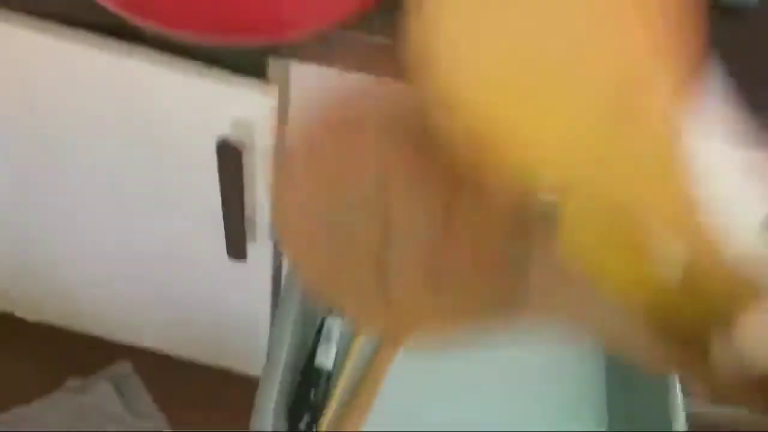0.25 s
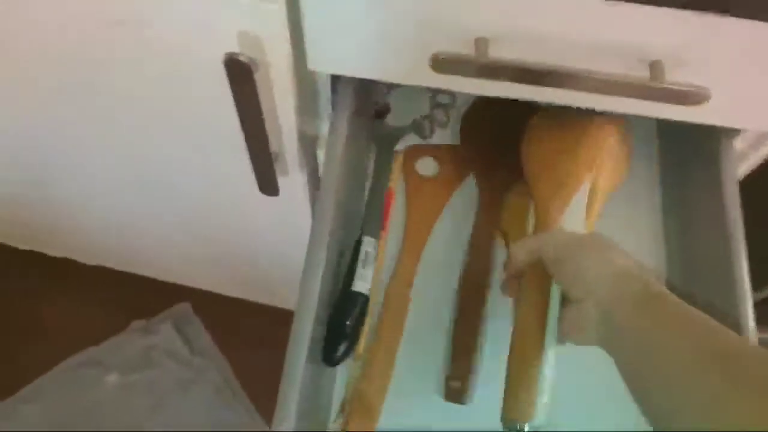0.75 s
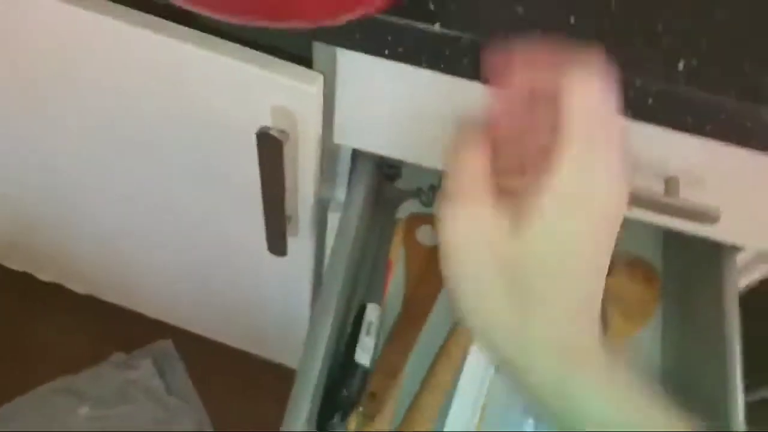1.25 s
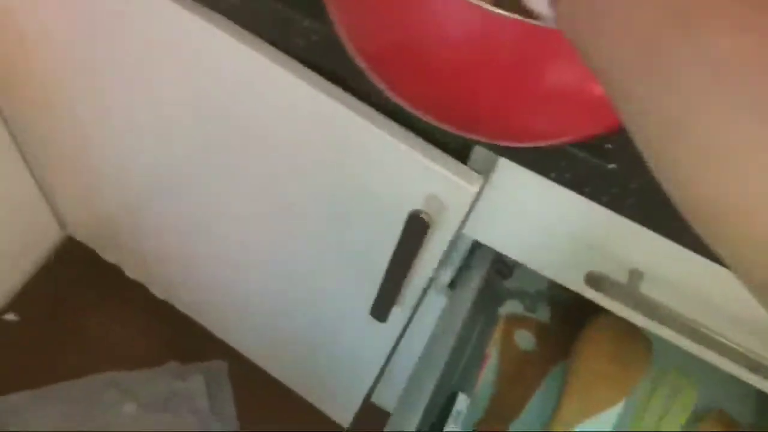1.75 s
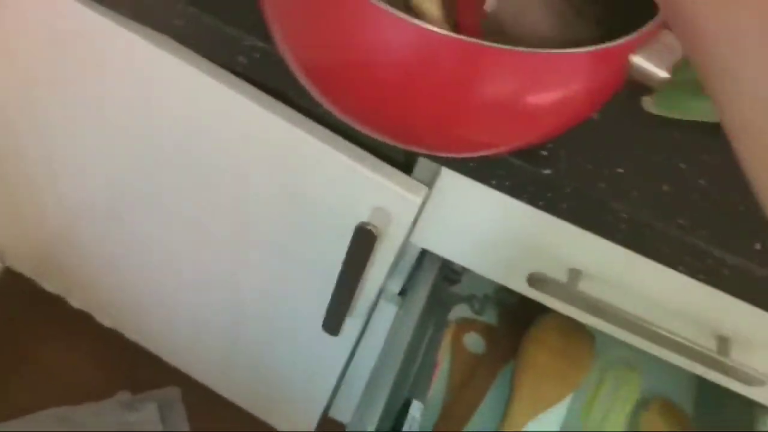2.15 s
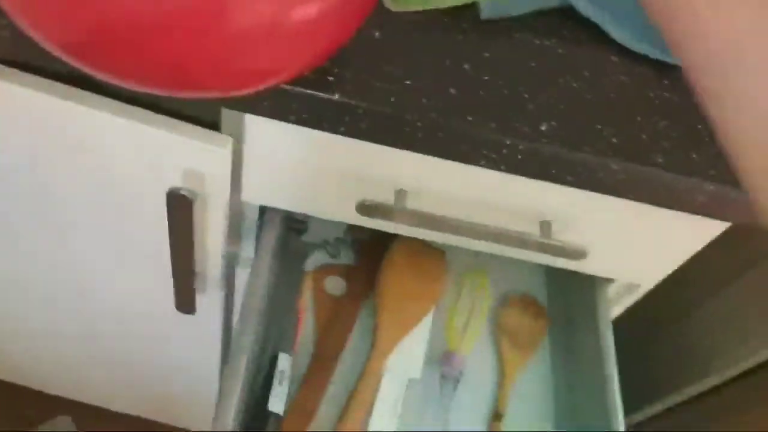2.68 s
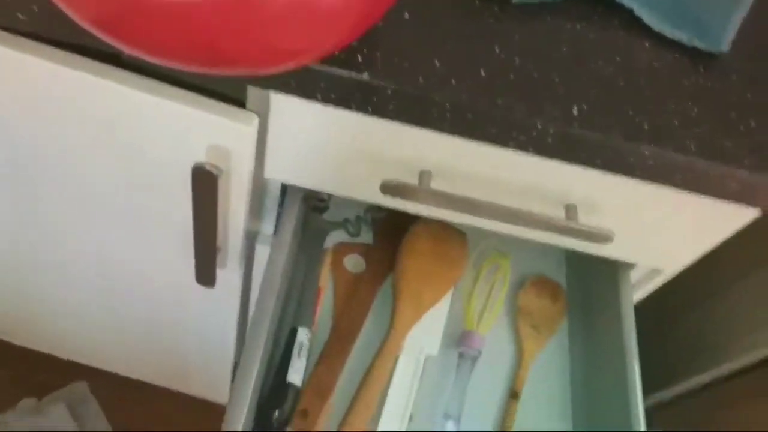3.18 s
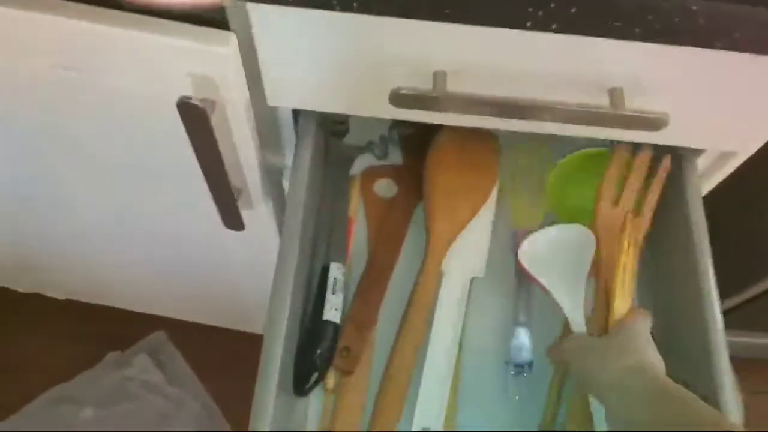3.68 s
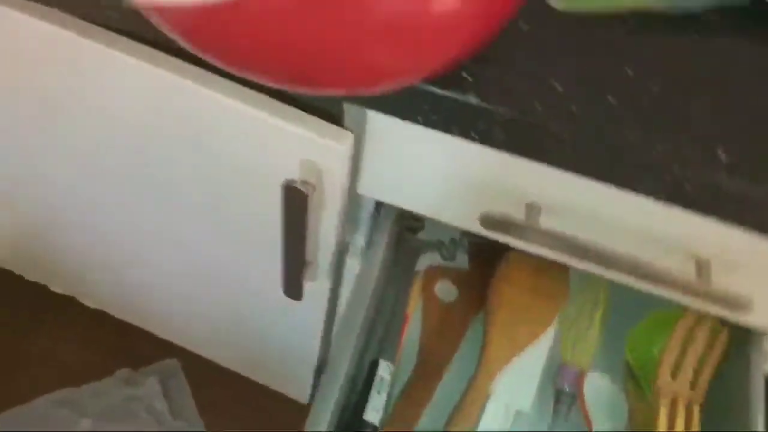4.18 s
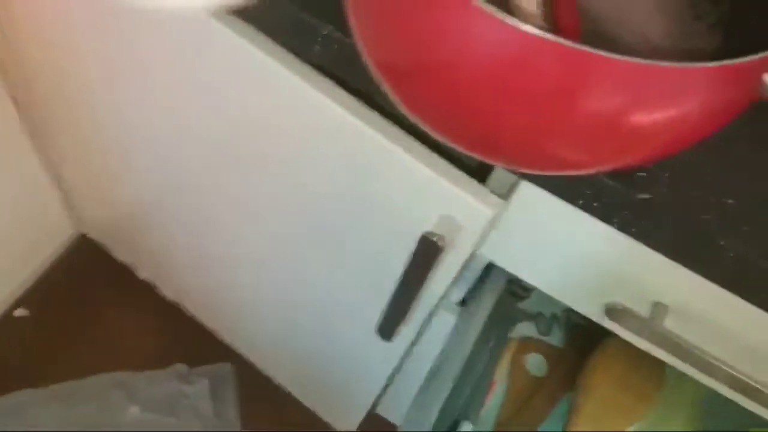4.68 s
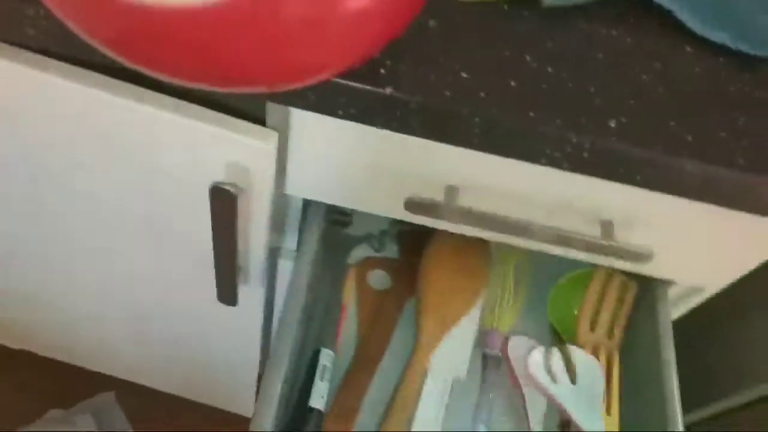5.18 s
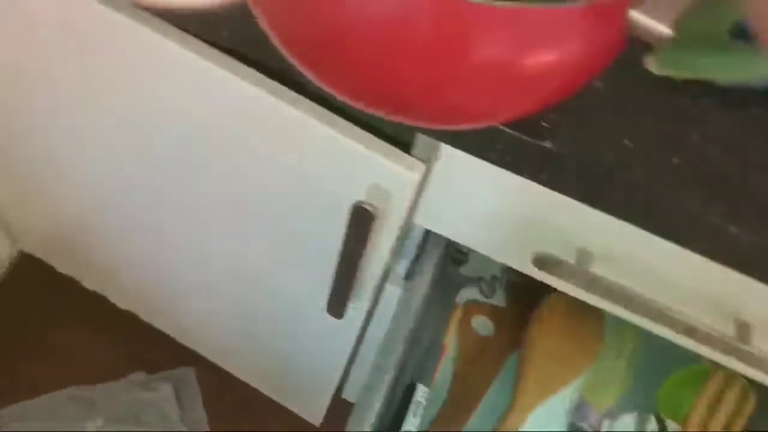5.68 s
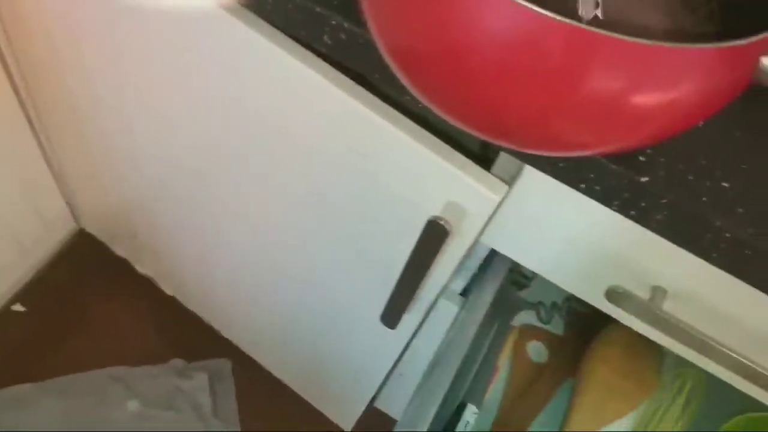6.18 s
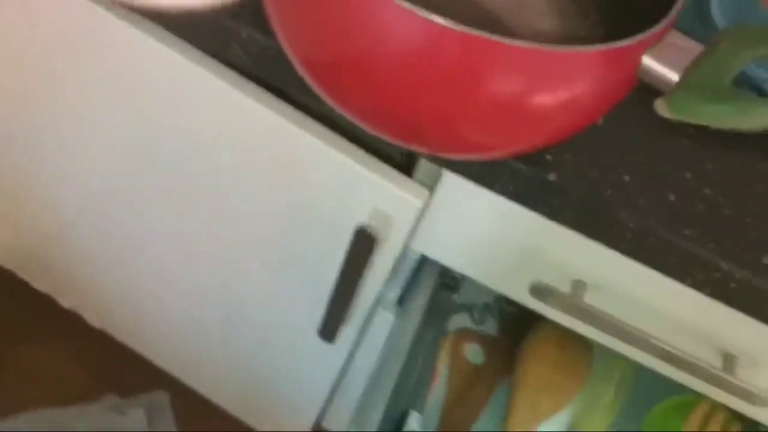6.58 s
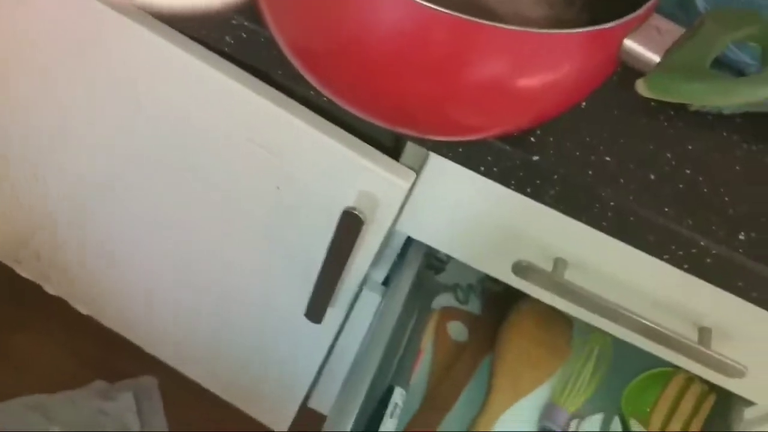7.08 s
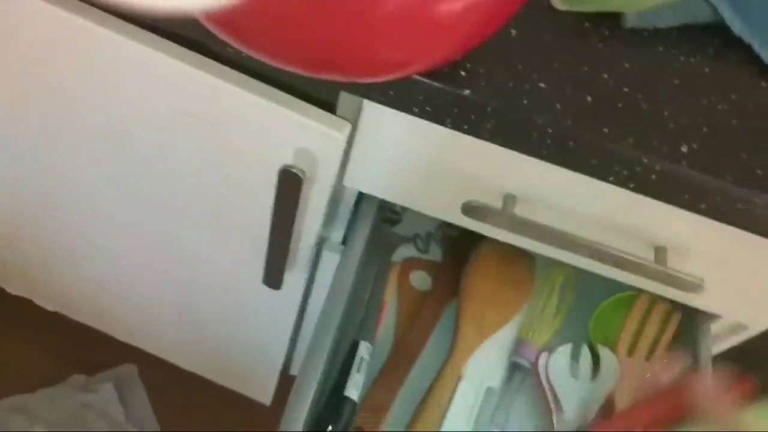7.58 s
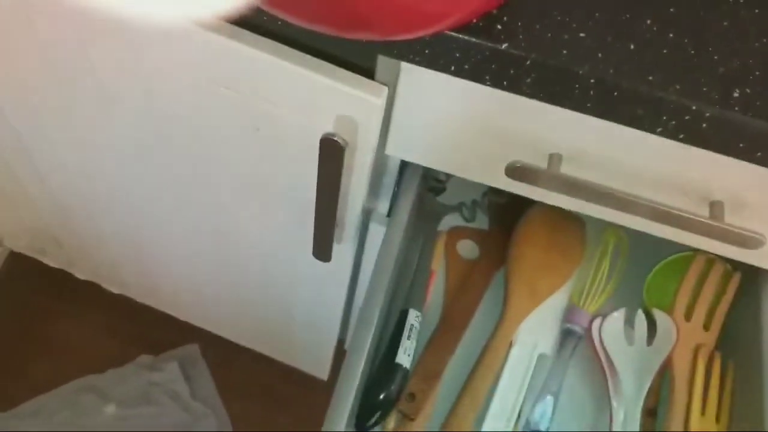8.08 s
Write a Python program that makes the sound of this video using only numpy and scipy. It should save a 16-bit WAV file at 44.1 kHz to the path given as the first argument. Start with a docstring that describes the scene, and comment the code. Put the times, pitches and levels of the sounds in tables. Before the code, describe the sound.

Handfuls of wooden, plastic and steel utensils clatter into an open kitchen drawer, with metallic pan rummaging and small ringing clinks between drops.

```python
"""A hum, a low rumble and a sweep of rustle open the scene, with a short scrape and a faint tick. Then handfuls
of utensils go from a pan on the counter into an open kitchen drawer: wooden spoons, a whisk, plastic servers, a
hard salad fork, then small steel cutlery; between drops the hand rummages in the pan. Each contact cracks,
rings its utensil, knocks the drawer's bottom and rebounds; the harder it is, the more treble and the less
knock. A small hard kitchen answers, and a limiter holds the peaks."""
import sys
import numpy as np
from scipy import signal
from scipy.fft import rfft, irfft, next_fast_len
from scipy.io import wavfile
from scipy.ndimage import uniform_filter1d, minimum_filter1d, map_coordinates

SR = 44100
rng = np.random.default_rng(int(sys.argv[2]) if len(sys.argv) > 2 else 0)


def file_out(sig):
    """Save sig as 16-bit WAV at sys.argv[1]."""
    # one column per channel
    cols = np.atleast_2d(sig).T
    # limit, then scale
    lim = np.clip(cols, -1, 1)
    pcm = np.round(lim * 32767).astype(np.int16)
    wavfile.write(sys.argv[1], SR, pcm)


N = 367794
HIT = np.arange(3 * 2 ** 13) / SR  # time since a contact [s]
CLACK_BINS = np.fft.rfftfreq(2 ** 13, 1 / SR)  # frequencies of a short clack [Hz]


def amp(db):
    """Decibels to gain."""
    return 10 ** (np.asarray(db) / 20)


def unit(x):
    """Scaled to rms 1."""
    return x / np.sqrt(np.mean(x ** 2) + 1e-20)


def along(points, hz):
    """Curve through (frequency, value) points on a log frequency axis."""
    f, v = np.transpose(points)
    return np.interp(np.log(hz + 1), np.log(f + 1), v)


def fade(t, t60):
    """Exponential decay, 60 dB in t60 seconds."""
    return np.exp(-np.log(1000) * t / np.maximum(t60, 1e-3))


def add(track, s, sound):
    """Mix a sound into a track at time s."""
    room = track[max(round(s * SR), 0):][:len(sound)]
    room += sound[:len(room)]


def noise(colour, size):
    """Noise of rms 1, shaped by a colour curve."""
    m = next_fast_len(size)
    white = rfft(rng.standard_normal(m))
    return unit(irfft(white * amp(along(colour, np.fft.rfftfreq(m, 1 / SR))), m)[:size])


# How long the small hard kitchen rings: (frequency [Hz], t60 [s])
KITCHEN_DECAY = [(150, 0.059), (600, 0.5), (2000, 0.53), (5000, .55), (9000, 0.27), (15000, 0.23)]
# Strength of the wall reflections: (frequency [Hz], level [dB])
WALL_REFLECTIONS = [(100, 5), (500, -1), (2000, -2.5), (5000, -6.5), (9000, 0), (15000, -2)]


def kitchen(x, wet_db, beamed=1):
    """Adds a freshly drawn noise tail that dies away band by band; beamed resonances stand out less in it,
    since the tail gathers sound sent in all directions."""
    hop = 2 ** 7
    hz = np.fft.rfftfreq(2 * hop, 1 / SR)
    spread = np.interp(hz, CLACK_BINS, np.ones(len(CLACK_BINS)) / np.sqrt(beamed))
    decay = fade(HIT[::hop, None], along(KITCHEN_DECAY, hz))
    gain = decay * spread * amp(along(WALL_REFLECTIONS, hz))
    white = rfft(rng.standard_normal((len(gain), 2 * hop), dtype=np.float32))
    frames = irfft(white * np.float32(gain))
    frames = frames * np.sin(np.pi * np.arange(2 * hop) / (2 * hop))
    tail = (frames[1:, :hop] + frames[:-1, hop:]).ravel()
    tail = tail * (1 - fade(HIT[:-hop], 0.0039))  # the tail builds up just behind the direct sound
    response = amp(wet_db) * tail / np.sqrt(np.sum(tail ** 2))
    response[0] = 1  # direct sound
    return signal.fftconvolve(np.float32(x), np.float32(response))


# Sweeps of the arm and what it carries: (middle [s], half length [s], rustle level [dB], hiss level [dB])
ARM_SWEEPS = [(0.155, 0.48, -53.5, -59.5), (0.682, 0.33, -58, -60.5), (1.599, 0.78, -60, -65.5),
              (2.58, 0.16, -57.5, -66), (3.542, 0.18, -63, -60), (4.3, 0.19, -61, -70),
              (8.31, 0.79, -62, -65.5)]
# Level of the rumble over time: (time [s], level [dB])
RUMBLE_LEVEL = [(0, -74), (2.1, -80.5), (2.7, -63), (4.9, -86.5), (6.6, -90), (7.3, -65.5), (8.3, -65.5)]
# Colours of still kitchen air, rumble, rustle and hiss: (frequency [Hz], density [dB per Hz])
STILL_AIR = [(25, -27), (65, -17), (105, -1.5), (300, -15), (460, -11.5), (700, -21), (1500, -20),
             (3000, -28), (7200, -29.5), (9000, -22), (11000, -34)]
RUMBLE_COLOUR = [(25, -24.5), (60, -15.5), (98, 0), (140, -1), (300, -17), (1000, -73)]
RUSTLE_COLOUR = [(30, -39.5), (90, -15.5), (170, -4.5), (420, -6.5), (700, -10.5), (1500, -23.5),
                 (3000, -63.5)]
HISS_COLOUR = [(500, -31.5), (1000, -9), (2400, -6.5), (3000, -12.5), (4800, -3.5), (6200, -12.5),
               (9200, -12.5), (15000, -32)]
# Slow unevenness of the background, also heard in the hum: (frequency [Hz], density [dB per Hz])
WAVER_COLOUR = [(1, -3.5), (12, -1), (40, -49), (200, -120)]


def background():
    """Still air, a soft rumble, and a rustle and hiss that swell and fade with each sweep of the arm."""
    t = np.arange(N) / SR
    rustle, hiss = np.zeros(N), np.zeros(N)
    for s, half_length, rustle_db, hiss_db in ARM_SWEEPS:
        speed = np.exp(-((t - s) / half_length) ** 2)
        rustle += amp(rustle_db) * speed
        hiss += amp(hiss_db) * speed
    rumble = amp(np.interp(t, *np.transpose(RUMBLE_LEVEL)))
    x = amp(-68.0) * noise(STILL_AIR, N)
    for level, colour in ((rumble, RUMBLE_COLOUR), (rustle, RUSTLE_COLOUR), (hiss, HISS_COLOUR)):
        unevenness_db = 0.93 * noise(WAVER_COLOUR, N)
        x += level * amp(unevenness_db) * noise(colour, N)
    return x


HUM_HZ, HUM_OCTAVE_DB = 199.2, -6
# Level of the appliance hum: (time [s], level [dB])
HUM_LEVEL = [(0, -56.5), (.6, -58.5), (1.9, -66.5), (3.3, -90)]


def hum():
    """A faint, slightly wavering appliance hum, a sine and its octave, fading over the first seconds."""
    t = np.arange(N) / SR
    octave = amp(HUM_OCTAVE_DB) * np.sin(4 * np.pi * HUM_HZ * t)
    tone = unit(np.sin(2 * np.pi * HUM_HZ * t) + octave)
    level_db = np.interp(t, *np.transpose(HUM_LEVEL))
    return tone * amp(level_db + 1.6 * noise(WAVER_COLOUR, N))


# Soft pushes on the drawer, and low drawer knocks as the cutlery lands near the end: # (time [s], level [dB],
# lower resonance [Hz], upper resonance [Hz], rise [s], t60 [s])
DRAWER_BUMPS = [(0.894, -19.5, 131, 171, .012, 0.14), (.903, -8, 53.95, 84.33, 0.028, 0.035),
                (4.28, -42, 632, 668, 0.036, 0.18), (4.51, -31, 409, 476, 0.08, 0.17),
                (8.031, -47.5, 290, 507, 0.009, 0.19), (8.317, -45.5, 306, 393, 0.018, .15)]


def bumps():
    """Each soft push or knock swells and dies away in two low resonances of the drawer."""
    track = np.zeros(N)
    for s, db, low_hz, high_hz, rise, t60 in DRAWER_BUMPS:
        sway = np.sin(2 * np.pi * low_hz * HIT) + np.sin(2 * np.pi * high_hz * HIT)
        add(track, s, amp(db) * sway * fade(HIT, t60) * (1 - fade(HIT, rise)))
    return track


SLIPS_PER_S, SLIP_LOW_HZ, SLIP_HIGH_HZ = 900, 720, 6000
SLIP_RANGE_DB, SLIP_CYCLES = 15, 20  # spread of sizes; cycles until a slip is 60 dB down
# Handles scraping along the pan: (time [s], length [s], level [dB])
PAN_SCRAPES = [(.161, .1, -54), (1.63, .11, -45), (1.763, .13, -41)]


def scrapes():
    """Handles dragged along the pan stick and slip: a crowd of tiny ticks, each with its own pitch and size."""
    track, t = np.zeros(N), HIT[:2 ** 10]
    for s, length, db in PAN_SCRAPES:
        stroke = np.zeros(int(length * SR) + len(t))
        for when, pitch, size in rng.random((int(SLIPS_PER_S * length), 3)):
            hz = SLIP_LOW_HZ * (SLIP_HIGH_HZ / SLIP_LOW_HZ) ** pitch
            tick = np.sin(2 * np.pi * hz * t) * fade(t, SLIP_CYCLES / hz)
            add(stroke, when * length, amp(SLIP_RANGE_DB * size) * tick)
        add(track, s, kitchen(amp(db) * unit(stroke), wet_db=-11))
    return track


# Utensils skidding over each other: (time [s], length [s], scrape level [dB], drawer level [dB])
UTENSIL_SKIDS = [(0.872, 0.24, -29, -29.5), (3.985, 0.028, -23.5, -40.5), (4.503, 0.11, -57, -52),
                 (5.302, 0.25, -31, -34), (7.9, 0.38, -51, -57)]


def skids():
    """Sliding handles catch and slip in grains of noise, and the drawer's bottom drones along."""
    track = np.zeros(N)
    for s, length, scrape_db, drawer_db in UTENSIL_SKIDS:
        size = int(length * SR)
        progress = np.arange(size) / size
        grains = unit(amp(3.4 * noise([(30, 12.0), (250, -14.0), (700, -43.5)], size)))
        scrape = amp(scrape_db) * grains * noise(FORK_COLOUR, size)
        drone = amp(drawer_db) * noise(KNOCK_COLOUR, size)
        swell = unit(np.sin(np.pi * progress ** 0.15))  # quick start, long fall
        add(track, s, kitchen((scrape + drone) * swell, wet_db=-2.0))
    return track


def causal(gain):
    """The minimum-phase response with this gain: it starts only at the blow."""
    cepstrum = irfft(np.log(np.maximum(gain, 1e-6)))
    half = len(cepstrum) // 2
    return np.exp(rfft(np.r_[cepstrum[0], 2 * cepstrum[1:half], np.zeros(half)]))


def ripple(width_hz, depth_db):
    """Random peaks and dips over frequency: the spot that is struck feeds some modes and misses others."""
    heights = rng.standard_normal(2 ** 11)
    return amp(depth_db * map_coordinates(heights, [CLACK_BINS / width_hz], mode="wrap"))


def burst(response, t60, crack):
    """Filtered noise as a crowd of short-lived modes behind a sharp crack; rms 1 over its first 6 ms."""
    t = HIT[:2 ** 13]
    push = rng.standard_normal(len(t)) * (fade(t, t60) + crack * fade(t, 0.0033))
    x = irfft(rfft(push) * response)
    return np.pad(x / np.sqrt(np.mean(x[:2 ** 8] ** 2)), (0, len(HIT) - len(t)))


FREE_RING_S = .026  # how long a struck utensil rings freely before it touches a neighbour


def ring(modes, favoured, drift_hz):
    """Decaying sine modes: the blow's favoured ones sing out until a neighbour is touched, and shifting
    contact detunes them all."""
    hz, db, t60 = np.transpose(modes).astype(np.float32)[:, :, None]
    t = HIT.astype(np.float32)
    size = amp(db + rng.normal(0, 0.76, db.shape)) * rng.choice([-1, 1], db.shape)
    drift = np.float32(drift_hz / SR * rng.standard_normal((len(hz), 2 ** 6)))
    cycles = hz * t + np.cumsum(np.repeat(drift, len(t) // 2 ** 6, axis=1), axis=1)
    decay = np.exp(-np.float32(np.log(1000) / np.maximum(t60, .07)) * t)  # no mode dies faster than 0.07 s
    free = 1 + np.float32(favoured(hz)) * np.float32(np.exp(-(HIT / FREE_RING_S) ** 2))
    return np.sum(np.float32(size) * np.sin(2 * np.pi * cycles) * decay * free, axis=0)


# First flight [s], mean ratio of each flight to the last, log spread of the flights
BOUNCE_S, BOUNCE_SHRINK, BOUNCE_SCATTER = .026, 0.65, 0.28


def rebounds(clack, bounce_db, count=2):
    """A loose utensil hops and lands again, softer each time and after a flight that tends to be shorter."""
    hop = np.arange(count)
    flights = BOUNCE_S * BOUNCE_SHRINK ** hop * np.exp(BOUNCE_SCATTER * rng.standard_normal(count))
    track = np.zeros(len(clack))
    for k, s in enumerate(np.cumsum(flights)):
        add(track, s, amp(bounce_db) / (k + 1) * clack)
    return track


CLACK_LOW_HZ = 160  # utensils are too small to radiate below this
# Colour of the knock on the drawer's bottom: (frequency [Hz], density [dB per Hz])
KNOCK_COLOUR = [(30, -58.5), (80, -39), (155, -19), (220, -5), (420, 1.5), (660, -1), (900, -7),
                (1600, -16.5), (3000, -55.5)]
# Ringing of the drawer: (frequency [Hz], level [dB], t60 [s])
DRAWER_MODES = [(224.5, -1.5, 0.42), (284.5, -0.5, 0.42), (326, -3, 0.3), (397, 2, 0.37), (454, 4, 0.35),
                (510, 0, 0.22), (640, 1, 0.33)]


def contacts(table, colour, modes, clack_db, clack_t60, width_hz, lift_db, treble_db, knock_db,
             knock_slope, ring_db, bounce_db, crack, wet_db, drift_hz=10):
    """Every contact clacks, rings the utensil and knocks the board under it; hardness trades knock for treble.

    Contact tables give level over clack_db, and hardness: low for a flat landing on the board, high for an
    edge that hits another utensil. A fifth column, if any, is extra ring over ring_db."""
    track, hz = np.zeros(N), CLACK_BINS
    bright = 1 / (1 + (5500 / (hz + 1)) ** 8)  # share of the power that counts as treble
    radiated = hz ** 2 / (hz ** 2 + CLACK_LOW_HZ ** 2)
    for s, db, hardness_db, favoured_hz, *extra_ring_db in table:
        def favoured(f):
            """One resonance of the utensil stands out among many."""
            return 1 + amp(lift_db) / (1 + (2 * (f - favoured_hz) / width_hz) ** 2)

        peaks = favoured(hz) * ripple(width_hz=200, depth_db=2.2)
        gain = amp(along(colour, hz)) * peaks
        board = amp(along(KNOCK_COLOUR, hz)) * ripple(width_hz=49, depth_db=2.0)
        clack = burst(causal(gain * np.sqrt(1 - bright) * radiated), clack_t60, crack)
        sheen = burst(causal(gain * np.sqrt(bright)), 0.54 * clack_t60, crack)
        sheen = amp(treble_db + hardness_db) * sheen
        drawer_ring = amp(-24.0) * ring(DRAWER_MODES, np.ones_like, drift_hz=1.5)
        thud = burst(causal(board), 0.042, crack) + drawer_ring
        thud = amp(knock_db - knock_slope * hardness_db) * thud
        utensil_ring = amp(ring_db + sum(extra_ring_db)) * ring(modes, favoured, drift_hz)
        blow = clack + sheen + thud + rebounds(clack + thud, bounce_db) + utensil_ring
        add(track, s, kitchen(amp(db + clack_db) * blow, wet_db, peaks))
    return track


PAN_DRIFT_HZ = 90  # utensils shifting in the pan smear its ring into a wash this wide
# Contacts in the pan: (time [s], level [dB], hardness [dB], favoured resonance [Hz])
RUMMAGE_CONTACTS = [(1.6287, -24.5, 2.5, 1880), (1.6442, -18.5, -5.5, 1950), (1.7285, -16, -7, 2140),
                    (1.7655, -33, -12, 1003), (1.7769, -18.5, 0, 2280), (1.795, -24.5, 7.5, 1640),
                    (1.806, -23.5, 5, 1150), (1.8174, -18, 6, 2500), (1.832, -29.5, 3, 1050),
                    (1.9076, -30, 3, 1050), (2.1545, -15, -4.5, 1850), (2.2822, -17.5, -12.5, 1880),
                    (2.6688, -1.5, -3.5, 1604), (2.6793, -2.5, 18, 7520), (2.8459, 2, -1.5, 1680),
                    (2.8684, -4.5, 7.5, 2400), (2.8834, -13, 17, 2194), (3.0235, -11.5, 1.5, 1850),
                    (3.378, -28, 2, 1793), (3.419, -28.5, -14.5, 2042)]
# Colour of the pan's clack: (frequency [Hz], density [dB per Hz])
PAN_COLOUR = [(400, -31.5), (1050, -7), (1350, -15), (1620, -5), (2050, -1.5), (2450, -9.5), (2900, -4.5),
              (7700, -6.5), (15500, -17)]
# Ringing of the pan: (frequency [Hz], level [dB], t60 [s])
PAN_MODES = [(1660, 1, .5), (1820, 5, .65), (1980, 5, .8), (2150, 4, .72)]


def rummage():
    """The hand stirs the pan: its hollow body gives a broad resonance and a smeared ring, with little knock."""
    return contacts(RUMMAGE_CONTACTS, PAN_COLOUR, PAN_MODES, clack_db=-13.0, clack_t60=0.065,
                    width_hz=480, lift_db=9, treble_db=-9.0, knock_db=-18.0, knock_slope=0.075,
                    ring_db=-35, bounce_db=-26.0, crack=2.5, wet_db=-5.5, drift_hz=PAN_DRIFT_HZ)


# Clinks: (time [s], level [dB], hardness [dB], favoured resonance [Hz])
CLINK_CONTACTS = [(5.889, -14, 1.5, 3500), (5.909, -7.5, 4, 3550), (5.916, -7, -7, 3500)]
# Ringing of a clink: (frequency [Hz], level [dB], t60 [s])
CLINK_MODES = [(3250, -2.4, 0.55), (3600, -0.054, 0.46), (3760, 0, 0.66), (3950, -1.8, 0.93)]


def clinks():
    """A few close-set modes under a strong resonance clink with a smeared ring and hardly any knock."""
    return contacts(CLINK_CONTACTS, FORK_COLOUR, CLINK_MODES, clack_db=-13.0, clack_t60=0.044,
                    width_hz=630, lift_db=17.0, treble_db=-2.5, knock_db=-36.5, knock_slope=0.27,
                    ring_db=-28.0, bounce_db=-23, crack=0.44, wet_db=-6.5, drift_hz=PAN_DRIFT_HZ)


# Steel contacts, ringing more when they hang free than when they lie on something; the first row is a # faint
# early tick: (time [s], level [dB], hardness [dB], favoured resonance [Hz], extra ring [dB])
CUTLERY_CONTACTS = [(.3484, -31.5, -20.5, 3510, -11.5), (6.5316, -33, 1, 4200, 8.5),
                    (6.5396, -36.5, 0, 6000, -4), (6.5545, -35, 11, 4985, 16), (6.6539, -26, 5, 4340, 0),
                    (6.8257, -41, -6, 4520, -8), (7.1544, -32.5, -0.5, 2300, -2),
                    (7.868, -19.5, 5.5, 9200, -10), (7.9168, -16, -4.5, 1800, -8),
                    (7.9231, -14, -1.5, 3870, -6), (7.9702, -26.5, 8.5, 8900, -1),
                    (8.031, -19, 5.5, 3420, 6), (8.043, -27, 7, 13500, -17), (8.0777, -29, -4, 7000, 3),
                    (8.113, -20, 4.5, 7160, 6), (8.318, -30.5, 10.5, 7950, -10)]
# Colour of the steel clack: (frequency [Hz], density [dB per Hz])
CUTLERY_COLOUR = [(400, -33.5), (800, -15), (1600, -5), (4200, -0.5), (7000, -3), (10500, -6.5),
                  (13000, -2.5), (15500, -13)]
# Ringing of the steel: (frequency [Hz], level [dB], t60 [s])
CUTLERY_MODES = [(3215, 1, 0.4), (4600, -13, .25), (4985, -11, 0.28), (6627, -13, 0.26)]


def cutlery():
    """Small steel pieces tick brightly and ring with little drift."""
    return contacts(CUTLERY_CONTACTS, CUTLERY_COLOUR, CUTLERY_MODES, clack_db=-16.0, clack_t60=0.05,
                    width_hz=710, lift_db=2.5, treble_db=1.0, knock_db=-18.5, knock_slope=0.8,
                    ring_db=-19, bounce_db=-18, crack=1.5, wet_db=-6.0, drift_hz=4)


# Fork contacts, ringing more when it hangs free than when it lies on something:
# (time [s], level [dB], hardness [dB], favoured resonance [Hz], extra ring [dB])
FORK_CONTACTS = [(4.507, -29, 11, 4270, -6), (4.526, -29, 11.5, 7450, 4.5), (5.2503, -13.5, 14, 5250, -11),
                 (5.275, -16, -8, 1900, -6), (5.291, -5, 6.5, 2830, -5.5), (5.297, -4, 5.5, 3100, -4),
                 (5.324, -14, 2, 3220, -3.5), (5.337, -16.5, -21, 1690, -8), (5.3525, -1.5, -1.5, 5500, 5),
                 (5.356, -7.5, 8.5, 8170, 6), (5.3695, -5, -8, 4200, -6.5), (5.412, -1, 3.5, 7740, 0.5),
                 (5.433, -7, 10.5, 6600, 5.5), (5.454, -12, 9, 4300, -6.5)]
# Colour of the fork's clack, also used for clinks and skids: (frequency [Hz], density [dB per Hz])
FORK_COLOUR = [(400, -39.5), (900, -11.5), (2300, -4), (4200, -3), (5600, -7), (8000, -13.5), (13500, -23),
               (16000, -28.5)]
# Ringing of the fork: (frequency [Hz], level [dB], t60 [s])
FORK_MODES = [(2218, -9, .5), (3246, -5, 0.37), (4274, 1, 0.5), (4727, -4, .23), (5455, -1, 0.32),
              (6024, -9, 0.45), (6568, -5, .42), (7397, -7, .37), (7741, -1.5, 0.45), (8166, 1, 0.14),
              (8985, -2, .28), (10100, -7, 0.22)]


def fork():
    """The hard salad fork clacks and rings in many modes."""
    return contacts(FORK_CONTACTS, FORK_COLOUR, FORK_MODES, clack_db=-13.5, clack_t60=0.1,
                    width_hz=200, lift_db=11, treble_db=-4.5, knock_db=-5.0, knock_slope=0.55,
                    ring_db=-19.5, bounce_db=-12.0, crack=.6, wet_db=-8.5)


# Server contacts: (time [s], level [dB], hardness [dB], favoured resonance [Hz])
SERVER_CONTACTS = [(3.5535, -7, -5.5, 1800), (3.581, -16, -4, 2300), (3.615, -26, -19.5, 1000),
                   (3.702, -11, -14, 3480), (3.716, -7, -5.5, 4860), (3.811, -14, -6, 2360),
                   (3.8905, -12.5, -8, 1910), (3.916, -17, -4.5, 1930), (3.969, 2, 5, 6560),
                   (3.993, -3.5, 2.5, 5300), (4.001, -6.5, 4.5, 4340), (4.0255, -13.5, 4, 5400),
                   (4.102, -15, 2.5, 2100)]
# Colour of the plastic clack: (frequency [Hz], density [dB per Hz])
SERVER_COLOUR = [(400, -32.5), (1000, -4), (1800, 3), (3200, 0.5), (5000, 0), (7000, -9.5), (13000, -21),
                 (16000, -33)]
# Ringing of the plastic: (frequency [Hz], level [dB], t60 [s], held to 0.07 s or more)
SERVER_MODES = [(1950, 0, 0.13), (3520, -0.5, 0.056), (4653, -6.5, .1), (5820, -1.5, 0.13),
                (6660, 6.5, 0.11)]


def servers():
    """Plastic servers land with a dull crack, a full knock and a short ring."""
    return contacts(SERVER_CONTACTS, SERVER_COLOUR, SERVER_MODES, clack_db=-12.5, clack_t60=0.063,
                    width_hz=190, lift_db=9.5, treble_db=-2.0, knock_db=-1.5, knock_slope=0.66,
                    ring_db=-29, bounce_db=-15.0, crack=0.27, wet_db=-6.5)


# Whisk contacts: (time [s], level [dB], hardness [dB], favoured resonance [Hz])
WHISK_CONTACTS = [(1.085, -5.5, -5, 3080), (1.1025, 0, 4, 2970), (1.1135, 1.5, -2.5, 4460),
                  (1.171, -9, 6, 4100)]


def whisk():
    """The whisk shares the spoons' colour and modes, with a broader resonance and less treble and ring."""
    return contacts(WHISK_CONTACTS, SPOON_COLOUR, SPOON_MODES, clack_db=-12, clack_t60=0.042,
                    width_hz=610, lift_db=12.5, treble_db=-12.5, knock_db=-12, knock_slope=0.99,
                    ring_db=-34.5, bounce_db=-19.0, crack=0.97, wet_db=-6.0)


# Spoon contacts: (time [s], level [dB], hardness [dB], favoured resonance [Hz])
SPOON_CONTACTS = [(.656, -11.5, -11, 1270), (.663, -3, -6, 4900), (.671, 0.5, 2.5, 2280),
                  (.679, -3.5, 4, 6080), (.688, -9, -11.5, 1090), (.7855, -8.5, -6.5, 2350),
                  (.799, -15, -12.5, 910), (.843, -1.5, 1.5, 2780), (.862, -1.5, -9.5, 1270),
                  (.879, -10.5, -2.5, 2977), (.892, 2, 5, 2980), (.903, 7.5, 6, 4750), (.920, 2, 2.5, 3800),
                  (.9345, -4.5, 7.5, 5700), (.940, 1, 8.5, 4275), (.946, -3.5, 9, 5750),
                  (.991, -8.5, 2.5, 4070), (1.012, -3, -10, 1532)]
# Colour of the wooden clack: (frequency [Hz], density [dB per Hz])
SPOON_COLOUR = [(400, -29), (1000, -6.5), (2200, -5), (5000, -3.5), (8400, -6.5), (14000, -19.5),
                (16000, -23.5)]
# Ringing of the wood: (frequency [Hz], level [dB], t60 [s])
SPOON_MODES = [(1733, 1.5, 0.21), (2379, 4.5, 0.2), (2830, -3, .15), (4045, -2, .12), (6100, -1, 0.1),
               (9300, -3, .1)]


def spoons():
    """A handful of wooden spoons clatters down in a dense run of sharp clacks, each with a narrow resonance."""
    return contacts(SPOON_CONTACTS, SPOON_COLOUR, SPOON_MODES, clack_db=-13.5, clack_t60=0.053,
                    width_hz=180, lift_db=11.5, treble_db=-3.5, knock_db=-4.5, knock_slope=.9,
                    ring_db=-22.5, bounce_db=-17.5, crack=0.99, wet_db=-9.0)


def scene():
    """Everything heard from above the drawer, the same in both channels."""
    x = background() + hum() + bumps() + scrapes() + skids()
    x += rummage() + clinks() + cutlery() + fork() + servers() + whisk() + spoons()
    return np.array([x, x])


TOP_HZ = 15800
# Where the two microphone ports differ: (frequency [Hz], width [Hz], share toward the left [gain])
PORT_RESONANCES = [(1890, 590, 0.26), (9850, 300, -0.13)]


def record(dry):
    """Two close ports with their own resonances, a fast limiter and a band limit."""
    m = next_fast_len(N + SR // 2)
    hz, spectrum = np.fft.rfftfreq(m, 1 / SR), rfft(dry, m)
    side = 0
    for centre, width, share in PORT_RESONANCES:
        side = side + share * 1j * hz * width / (centre * centre - hz * hz + 1j * hz * width)
    x = irfft(spectrum * np.array([1 + side, 1 - side]), m)[:, :N]
    # one gain for both channels dips around each peak over the ceiling
    needed = np.minimum(1, .86 / (np.abs(x).max(axis=0) + 1e-9))
    gain = uniform_filter1d(minimum_filter1d(needed, size=161), size=81)
    roll_off = 1 / (1 + (hz / TOP_HZ) ** 120)
    return irfft(rfft(x * gain, m) * roll_off, m)[:, :N]


dry = scene()
out = record(dry)
file_out(out)
```